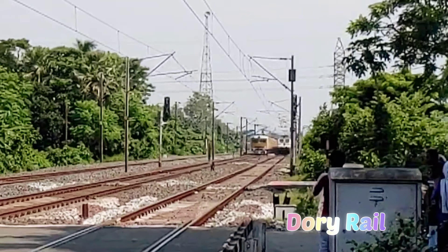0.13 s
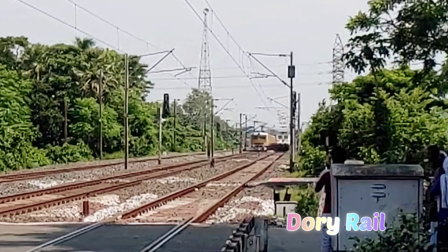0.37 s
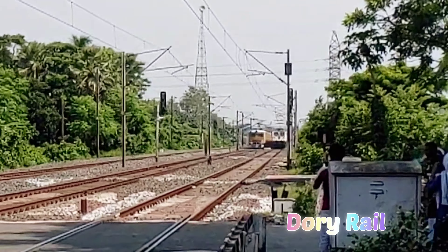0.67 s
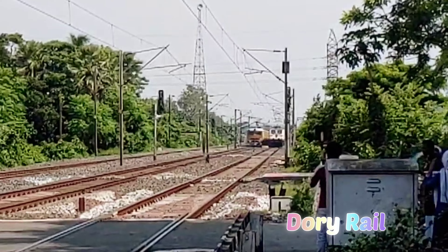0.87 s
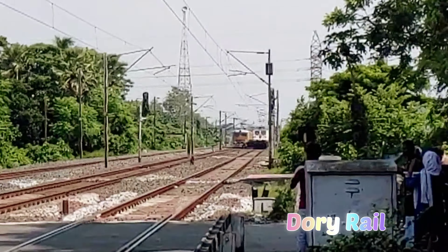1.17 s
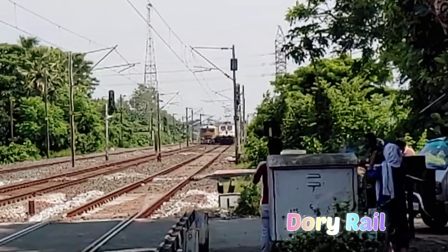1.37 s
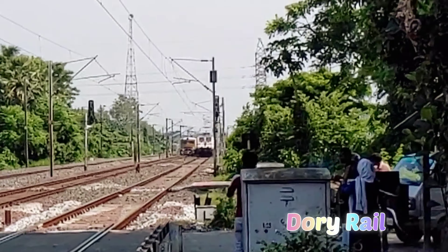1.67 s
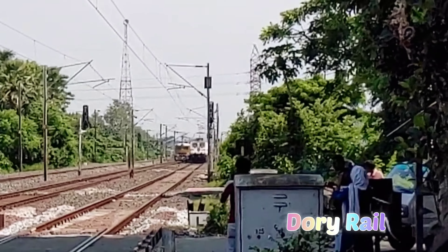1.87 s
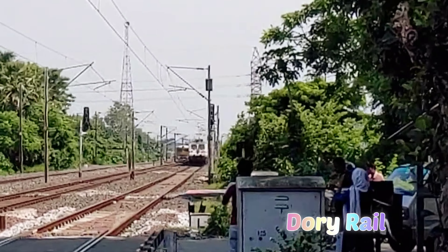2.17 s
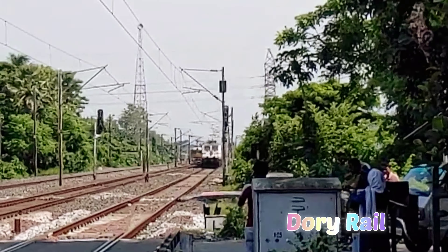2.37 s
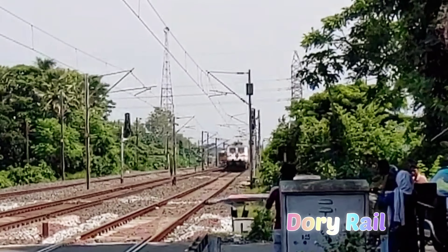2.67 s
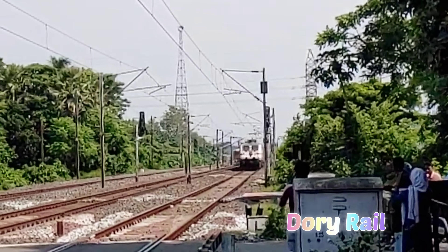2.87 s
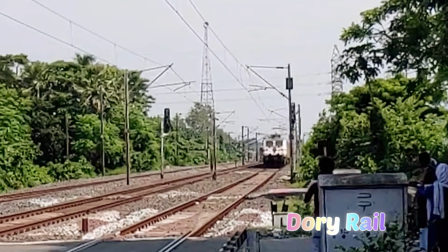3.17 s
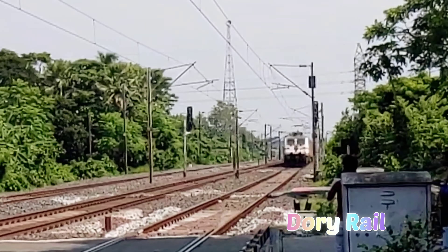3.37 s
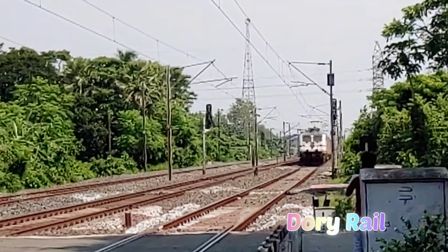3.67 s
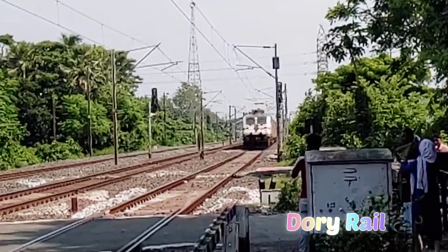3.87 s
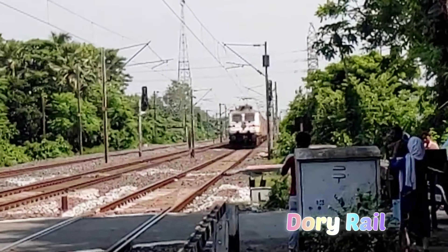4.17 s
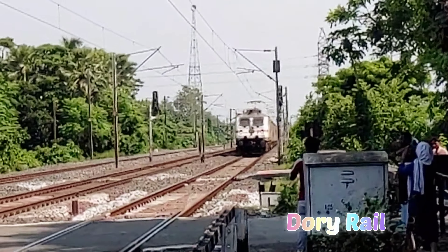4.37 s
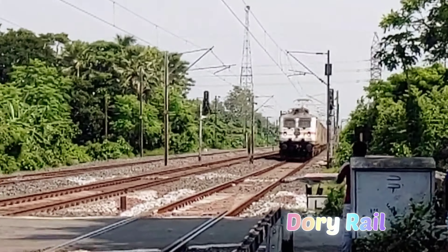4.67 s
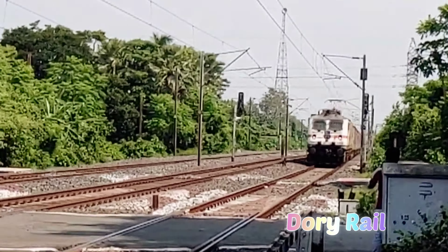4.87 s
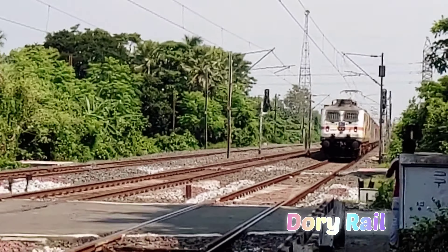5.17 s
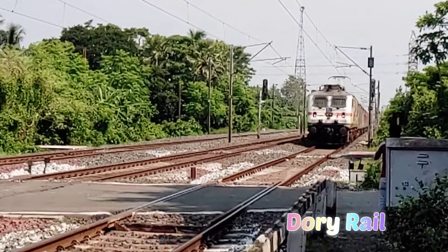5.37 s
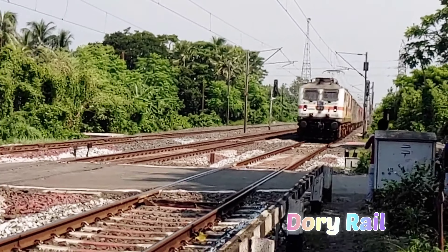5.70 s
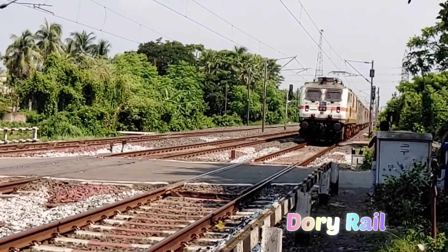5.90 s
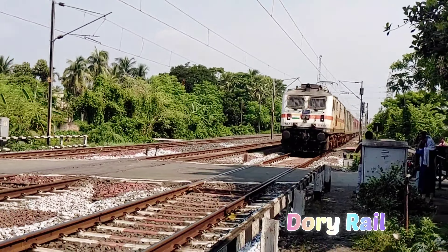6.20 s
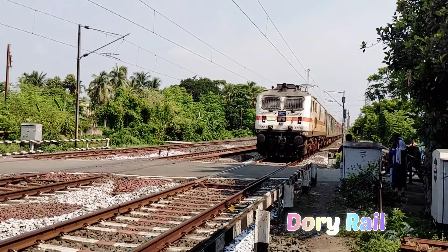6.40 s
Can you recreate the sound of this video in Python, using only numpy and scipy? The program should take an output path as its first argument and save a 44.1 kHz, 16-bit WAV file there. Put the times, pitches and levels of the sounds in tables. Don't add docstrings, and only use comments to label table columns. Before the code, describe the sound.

An electric train's air horn gives two long, harsh blasts as it nears a level crossing, with wind, crunching stones and a swelling rush.

```python
import sys
import numpy as np
from scipy import signal
from scipy.io import wavfile
from scipy.ndimage import uniform_filter1d, minimum_filter1d

SR = 44100
rng = np.random.default_rng(int(sys.argv[2]) if len(sys.argv) > 2 else 0)


def transcribe(signal):
    frames = np.atleast_2d(signal).T
    limited = np.clip(frames, -1, 1)
    pcm = np.round(limited * 32767).astype(np.int16)
    wavfile.write(sys.argv[1], SR, pcm)


def amplitude_ratio(level_db):
    exponent = np.asarray(level_db, float) / 20
    return 10 ** exponent


N = 288414
BLOCK = 64

# t/s, level/dB, brightness/(dB/octave)
RUSH = [(0, -43, -2.5), (1.6, -43.5, -0.55), (2.5, -36.5, 4), (3.3, -33.5, 8), (3.75, -33, -2.5),
        (4.4, -36.5, -0.54), (4.7, -34.5, -1.2), (5.4, -31, -2.5), (5.95, -24, 0), (6.2, -21.5, 0.5),
        (6.54, -26, 0)]


def rms_one(x):
    return x / np.sqrt(np.mean(np.abs(x) ** 2) + 1e-20)


def in_time(rows, step=1):
    s, *columns = np.transpose(rows)
    t = np.arange(0, N + step, step)[:N] / SR
    return [np.interp(t, s, column) for column in columns]


def at_hz(points, hz):
    points_hz, db = np.transpose(points)
    return np.interp(np.log(hz), np.log(points_hz), db)


def filtered(x, order, hz, kind="low"):
    return signal.sosfilt(signal.butter(order, hz, kind, fs=SR, output="sos"), x)


def drift(rate_hz):
    pole = np.exp(-2 * np.pi * rate_hz * BLOCK / SR)
    settle = 2000
    white = rng.standard_normal(N // BLOCK + 2 + settle)
    return rms_one(signal.lfilter([1], [1, -2 * pole, pole ** 2], white)[settle:])


def complex_drift(rate_hz):
    return drift(rate_hz) + 1j * drift(rate_hz)


def full(slow):
    return np.interp(np.arange(N) / BLOCK, np.arange(len(slow)), slow)


def bands(low_hz, count, per_octave=2):
    edges_hz = low_hz * 2 ** (np.arange(count + 1) / per_octave)
    white = rng.standard_normal((2, 2, N))
    for k, (low, high) in enumerate(zip(edges_hz, edges_hz[1:])):
        yield np.sqrt(low * high), filtered(white[k % 2], 2, [low, min(high, .45 * SR)], "band")


def bursts(rows, attack_s, release_s, sag_db):
    t = np.arange(N) / SR
    gains = []
    for s, hold_s, db in rows:
        corners_s = [s - attack_s, s, s + hold_s, s + hold_s + release_s]
        corners_db = [db - 34, db, db - sag_db, db - 38]
        gains.append(amplitude_ratio(np.interp(t, corners_s, corners_db, -200, -200)))
    return np.max(gains, axis=0)


def air():
    # t/s, level/dB, dullness/(dB/octave), ground echo detour/ms
    blasts = [
        [(1.58, -38.5, -4, 0.5), (1.70, -8, -3.5, 0.29), (1.9, -4.5, -2.5, 0.27), (2.2, 0, 1.5, 0.29),
         (2.7, 3.5, 3, 0.38), (3.1, 1, -1.35, .53), (3.5, 0.4, 1, 0.63), (3.79, -5, 9, 0.63),
         (3.95, -19, 27, 0.28)],
        [(4.53, 0.5, 0, 0.59), (4.65, -0.5, -0.9, .5), (5.2, 1.1, 0.73, 0.46), (5.55, 0.1, 1.42, 0.56),
         (5.8, 0.3, 0.4, 0.62), (6.0, 2.8, -0.7, 0.723), (6.2, 1.8, 0.7, 0.832), (6.35, 3, 0.94, 0.58),
         (6.54, 1.3, 1.1, 0.75)],
    ]
    # t/s, level/dB, dullness/(dB/octave), detour/ms
    second_onset = [
        (4.464, -40, 9, .5),
        (4.474, -16, 10, .5),
        (4.494, 3, 4, .5),
        (4.501, -12, 9, .5),
        (4.507, 3, 3, .5),
        (4.521, 2, 1.5, .5),
    ]

    def quiet(s):
        return [(s, -80, 6, .5)]

    return in_time(quiet(1.54) + blasts[0] + quiet(4.05) + quiet(4.45) + second_onset + blasts[1], step=BLOCK)


def ducking():
    duck_from_db = -9
    return -uniform_filter1d(np.maximum(air()[0] - duck_from_db, 0), size=40)


def rush():
    # f/Hz, density/(dB per Hz)
    rush_colour = [(120, -30), (200, -2.5), (288, -5), (346, 1.5), (415, -7), (517, 2.5), (599, -3),
                   (802, 3.5), (1700, -2.5), (2270, -4), (4640, -9.5), (5880, -18), (10200, -20),
                   (15800, -35)]
    # f/Hz, left-right likeness/1
    rush_likeness = [(60, 0.99), (240, 1), (950, 0.41), (3770, 0.18), (15000, 0.04)]
    # f/Hz, left minus right/dB
    rush_balance = [(200, -1), (700, -5), (3000, -2.5), (12000, -12)]
    patchy_db, duck_share = 1.2, 0.48
    level_db, tilt_db = in_time(RUSH, step=BLOCK)
    ducked_db = level_db + duck_share * ducking()
    together, out = drift(2.3), 0
    for hz, (mid, side) in bands(195.0, count=19, per_octave=3):
        alike = np.clip(at_hz(rush_likeness, hz), -1, 1)
        flicker_db = patchy_db * (together / 3 + drift(14))
        colour_db = at_hz(rush_colour, hz) - at_hz(rush_colour, 520) + 17.5
        dulling_db = np.minimum(tilt_db, 0) * np.log2(hz / 530)
        gain = full(amplitude_ratio(colour_db + ducked_db + dulling_db + flicker_db))
        pan = amplitude_ratio(at_hz(rush_balance, hz) / 2 * np.array([[1], [-1]]))
        out = out + gain * pan * (np.sqrt(1 + alike) * mid + np.sqrt(1 - alike) * side * [[1], [-1]])
    return out


def wind():
    # f/Hz, density/(dB per Hz)
    wind_colour = [(12, -41), (20, -3), (54, -0.5), (130, -9), (249, -22), (347, -76), (420, -64),
                   (550, -55), (920, -120)]
    # t/s, length/s, level/dB
    gust_events = [(0.2, 0.049, -33.5), (0.26, 0.038, -31), (0.39, 0.053, -35), (0.45, 0.026, -35),
                   (0.56, 0.021, -21.5), (0.61, 0.015, -16.5), (0.655, 0.067, -32), (0.8, 0.04, -32),
                   (0.92, 0.058, -29), (1.015, 0.011, -36), (1.095, 0.037, -27), (1.2, 0.08, -31),
                   (1.32, 0.035, -32), (1.425, 0.031, -34.5)]
    # t/s, length/s, level/dB
    buffets = [
        (3.55, 0.18, -44),
        (3.85, 0.45, -50),
        (4.33, 0.14, -39),
    ]
    lumpy_db, shared = 1.5, 0.2
    breeze_db, breeze_duck_share = -47.5, 0.25
    rumble_db, rumble_growth, rumble_duck_share = -6.5, 1.44, 1
    gust_left_db, gust_right_db = 5, -38
    low = sum(amplitude_ratio(at_hz(wind_colour, hz) + lumpy_db * full(drift(35))) * pair
              for hz, pair in bands(19.07, count=9))
    low = rms_one(low + shared * low[::-1])
    thin = filtered(low, 2, 75, "high")
    deep = filtered(low[::-1], 1, 140)
    duck_db = ducking()
    breeze = full(amplitude_ratio(breeze_db + breeze_duck_share * duck_db))
    breeze = breeze + bursts(buffets, attack_s=0.16, release_s=.06, sag_db=0.0)
    rush_db = in_time(RUSH, step=BLOCK)[0]
    train_db = rumble_growth * (rush_db + 36) - 36 + rumble_db + rumble_duck_share * duck_db
    gusts = bursts(gust_events, attack_s=0.058, release_s=0.073, sag_db=3) * amplitude_ratio([[gust_left_db], [gust_right_db]])
    return amplitude_ratio(7) * (deep * breeze + thin[::-1] * full(amplitude_ratio(train_db)) + (thin + .2 * low) * gusts)


def ring(clicks, hz, t60_s):
    r, w = amplitude_ratio(-60 / (t60_s * SR)), 2 * np.pi * hz / SR
    return signal.lfilter([0, np.sin(w)], [1, -2 * r * np.cos(w), r * r], clicks + 1e-18)


def grit():
    # t/s, length/s, level/dB
    crunch = [(0.264, 0.0021, -39.5), (0.413, 0.02, -39.5), (0.65, 0.046, -44), (0.75, 0.044, -48),
              (0.812, 0.0078, -26), (0.842, 0.053, -37), (0.968, 0.003, -40), (1.222, 0.0028, -33.5),
              (1.297, 0.048, -35), (1.355, 0.023, -35.5), (1.55, 0.03, -45), (1.592, 0.0055, -32.5),
              (1.625, 0.022, -39)]
    # f/Hz, level/dB
    grit_colour = [(700, -6), (1500, 7.5), (4500, 10.5), (7500, -13), (10500, 16), (14000, -19)]
    size, cycles, clicks_per_s = round(1.7 * SR), 6, 5000
    steps = bursts(crunch, attack_s=0.049, release_s=0.014, sag_db=-6.0) + amplitude_ratio(-63)
    sizes = amplitude_ratio(4 * np.minimum(rng.exponential(1, (2, size)), 5)) * rng.choice([-1, 1], (2, size))
    born = sizes * (rng.random((2, size)) < clicks_per_s / SR)
    clicks = born + .6 * born[::-1]
    pitches_hz, dealt = np.geomspace(700, 14000, 16), rng.integers(0, 16, size)
    grains = 0
    for k, hz in enumerate(pitches_hz):
        grains = grains + ring(clicks * (dealt == k), hz, cycles / hz) * amplitude_ratio(at_hz(grit_colour, hz))
    out = np.zeros((2, N))
    out[:, :size] = steps[:size] * rms_one(grains) * amplitude_ratio([[-2], [2]])
    return out


def stones():
    # t/s, peak/dB, f/Hz, crack/dB, left minus right/dB
    knocks = [(0.263, -20, 810, -42, -5), (0.41, -17, 740, -37, -2.5), (0.43, -23, 740, -36, -2.5),
              (0.751, -29, 775, -11, -13), (0.788, -24, 1180, -16, -12), (0.815, -19, 4500, -26, -23),
              (0.841, -30, 4450, -4, -18), (0.854, -25, 1430, -5, -5.0), (0.864, -22.5, 730, -5, -20),
              (0.894, -20, 4360, -13, -12), (0.915, -34, 791, -3, -15), (0.966, -47, 1060, -32, -4.5),
              (1.219, -18.5, 820, -17, -11), (1.296, -22, 600, -2.5, -2), (1.313, -18.5, 1050, -14, -18),
              (1.334, -20, 870, -17, -6), (1.359, -28, 3190, -15, -20), (1.525, -34, 1190, 0, -2),
              (1.571, -20.5, 2600, -14, -2.5), (1.594, -40, 780, -25, 14), (3.909, -16, 1040, -15, -4)]
    size, out = 2000, np.zeros((2, N))
    cracks = filtered(rng.standard_normal((len(knocks), size)), 2, [2500, 11500], "band")
    cracks = cracks * amplitude_ratio(-60 * np.arange(size) / SR / 0.066)
    for (s, peak_db, hz, crack_db, pan_db), crack in zip(knocks, cracks):
        click = np.zeros(size)
        click[0] = amplitude_ratio(peak_db - 5.5)
        knock = ring(click, hz, 0.034) + ring(click, 130 * hz ** .5, 0.0014)
        knock = knock + click[0] * amplitude_ratio(crack_db + 6) * crack
        at = round(s * SR)
        out[:, at:at + size] += knock * amplitude_ratio(np.array([[pan_db / 2], [-pan_db / 2]]))
    return out


def sum_partials(turn, paths):
    blocks = np.resize(turn, (paths.shape[2] - 1, BLOCK)).astype(np.complex64)
    part = np.arange(BLOCK, dtype=np.float32) / BLOCK
    carrier, out = 1, 0
    for path in paths.astype(np.complex64):
        carrier = carrier * blocks
        gain = path[:, :-1, None] + np.diff(path)[:, :, None] * part
        out = out + (gain * carrier).real
    return out.reshape(2, -1)[:, :N]


def jet_hiss(turn, jet_db):
    jet = filtered(rng.standard_normal((2, N)), 4, 8000, "high")
    jet = filtered(jet, 1, 11000) * (1 + 0.14 * turn.real)
    return full(amplitude_ratio(jet_db)) * rms_one(jet) * amplitude_ratio([[-2], [2]])


def horn():
    # t/s, f/Hz
    pitch = [(1.58, 367), (1.65, 361), (1.72, 357.3), (3.5, 357.2), (3.74, 363), (3.95, 366), (4.46, 404),
             (4.49, 394), (4.505, 384), (4.522, 359), (4.55, 357.4), (6.54, 357.0)]
    # t/s, scattered share/dB, air loss at 10 kHz/dB, loss above 11 kHz/(dB/kHz), left lag/samples
    nearness = [(1.6, -1.5, 40, 12, 1.7), (1.95, -5, 32, 8, 1.1), (2.3, -4.5, 17.5, 3, 1.64),
                (2.75, -13, 5.5, 4, 2.7), (2.98, -12.5, 18, 6, 2), (3.2, -11, 19.5, 1, 2.1),
                (3.45, -4.5, 14, 1, 5), (3.58, 3.5, 18, 8, 3.1), (4.5, -4, 23, 1.5, 2.1),
                (4.76, -7.5, 19.5, 0, 3.9), (4.9, -5.5, 23.5, -2.5, 4.2), (5.4, 0, 13.5, 0, 3.2),
                (5.62, -3, 14.5, -0.5, 4.5), (5.85, -7, 14.5, 1.3, 2.8), (6.54, -2, 11.5, -1, 5.25)]
    # f/Hz, level/dB
    bell = [(1430, 0), (1790, 2), (2140, -1), (2600, -10.5), (3300, -9), (4500, -10), (6000, -14.5),
            (8600, -23.5), (8900, -3), (10000, 3), (11500, -4.5), (15800, 0)]
    # f/Hz, left minus right/dB
    horn_balance = [(357, 3), (714, -2), (1071, -1), (1430, -4), (2140, 1.5), (4000, -1.5), (9000, -5.5)]
    sharp_db_per_percent = (-1.0, 1.0, -1.0)
    low_partials_db, blare_db, edge_hz = (-24.5, -18, -11), -17, 8500
    fundamental_db_per_s, fundamental_lead_s = 2.5, 0.12
    echo_share, echo_fade_hz = .62, 12000
    scatter_hz, kinship = 0.82, 0.093
    shimmer_db, shimmer_hz = -11.0, 14

    level_db, dull_db, detour_ms = air()
    scatter_db, far_db, loss_db, lag = in_time(nearness, step=BLOCK)
    size = len(level_db)
    t = np.arange(size) * BLOCK / SR
    early_db = np.interp(t + fundamental_lead_s * (t < 4.1), t, level_db) - level_db
    turning_db = fundamental_db_per_s * (t - 3) + early_db
    hz, = in_time(pitch)
    turn = np.exp(2j * np.pi * np.cumsum(hz + 0.396 * full(drift(24.4))) / SR)
    steady_hz = np.median(hz)
    sharp_percent = 100 * (in_time(pitch, step=BLOCK)[0] / steady_hz - 1)
    both, apart = 0, 0
    paths = np.zeros((44, 2, size), complex)
    for k in range(1, 45):
        partial_hz = k * steady_hz
        if k < 4:
            own_db = low_partials_db[k - 1] + turning_db * (k == 1) + sharp_db_per_percent[k - 1] * sharp_percent
        else:
            share = np.clip((partial_hz - 2500) / (edge_hz - 2500), 0, 1) ** 1.14
            lead_db = -far_db if partial_hz > 8800 else share * .5 * (28 - far_db)
            own_db = at_hz(bell, partial_hz) + blare_db + lead_db - loss_db * max(partial_hz / 1000 - 11, 0)
        echo = echo_share * np.exp(-partial_hz / echo_fade_hz - 2j * np.pi * partial_hz * detour_ms / 1000)
        level = amplitude_ratio(own_db + level_db - dull_db * max(np.log2(k / 2), 0)) * (1 - echo)
        level = level * np.exp(1j * amplitude_ratio(scatter_db + 9) * drift(.3) * (k < 8))

        rate_hz = scatter_hz * k ** 0.89 + 12.5 * (k == 1)
        keep = kinship if k > 7 else 0
        both = keep * both + np.sqrt(1 - keep ** 2) * complex_drift(rate_hz)
        apart = keep * apart + np.sqrt(1 - keep ** 2) * complex_drift(rate_hz)
        skirt = amplitude_ratio(shimmer_db + scatter_db + 2.5 + 1.5 * np.log2(k / 6))
        fast_hz = shimmer_hz * k ** 0.57
        shimmer_mid, shimmer_side = skirt * complex_drift(fast_hz), skirt * complex_drift(fast_hz)
        spread = amplitude_ratio(scatter_db - (8 if k < 2 else 13 if k < 4 else 11 if k < 8 else 2.5))
        side_spread = amplitude_ratio(scatter_db - (9 if k in (1, 3) else 0))
        scattered_mid = 0.95 * spread * both + 0.63 * shimmer_mid
        scattered_side = 0.52 * side_spread * apart + 0.72 * shimmer_side

        twist = np.pi * partial_hz * lag / SR * (2.5 if k == 2 else 1)
        lift = np.cos(np.minimum(twist, 1.1)) if k < 4 else 1
        for ear, sign in enumerate((1, -1)):
            direct = -np.exp(-1j * sign * twist) / lift
            pan = amplitude_ratio(sign * at_hz(horn_balance, partial_hz) / 2)
            arriving = direct + scattered_mid + sign * scattered_side
            paths[k - 1, ear] = level * pan * arriving / np.sqrt(1 + spread ** 2)
    jet_db = level_db - 4.0 * dull_db - far_db - 27 - 2 * loss_db + 4 * drift(8)
    return sum_partials(turn, paths) + jet_hiss(turn, jet_db)


def far_horn():
    # t/s, level/dB
    far_blast = [
        (1.6, -50),
        (1.75, 1),
        (2.15, -3),
        (2.45, -50),
    ]
    # f/Hz, level/dB
    far_lines = [
        (543.7, -45),
        (818.3, -38),
    ]
    level_db, = in_time(far_blast)
    t = np.arange(N) / SR
    out = 0
    for hz, db in far_lines:
        waver_db = 4.0 * full(drift(12))
        out = out + amplitude_ratio(db + 4.5 + waver_db) * np.sin(2 * np.pi * hz * t)
    return amplitude_ratio(level_db) * out


def scene():
    return rush() + wind() + grit() + stones() + horn() + far_horn()


def low_pass(x):
    return signal.sosfilt(signal.butter(12, 15930, fs=SR, output="sos"), x)


def record(dry):
    cut = filtered(dry, 2, 30, "high")
    room_left = np.minimum(1, 1.7 / (np.abs(cut).max(axis=0) + 1e-9))
    gain = uniform_filter1d(minimum_filter1d(room_left, size=400), size=300)
    held = cut * gain
    mix = .94 * held / (1 + held ** 4) ** .25
    return low_pass(mix)


dry = scene()
out = record(dry)
transcribe(out)
```